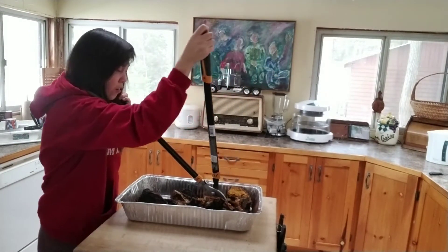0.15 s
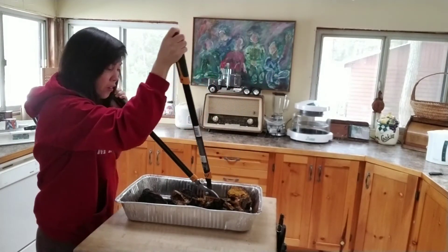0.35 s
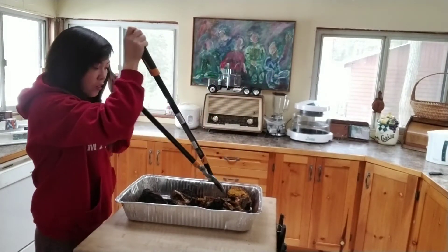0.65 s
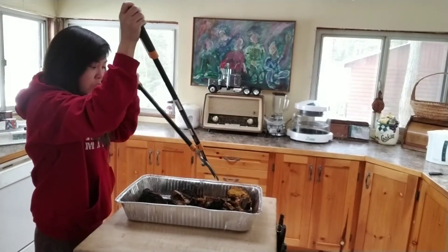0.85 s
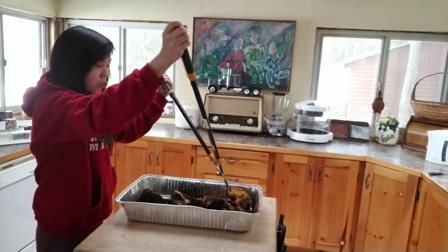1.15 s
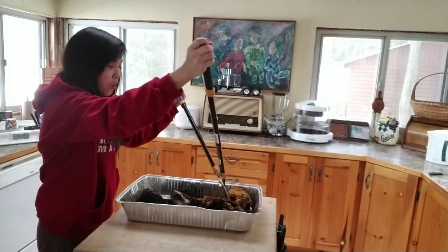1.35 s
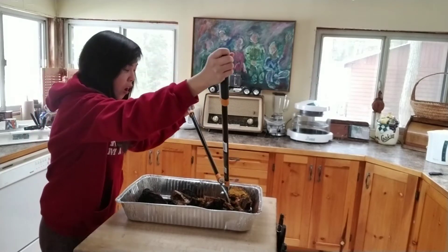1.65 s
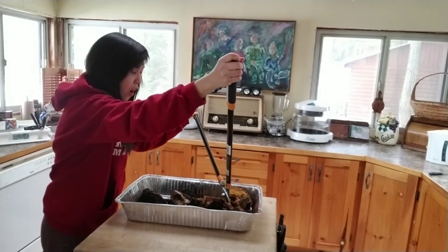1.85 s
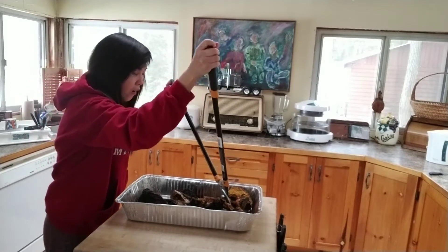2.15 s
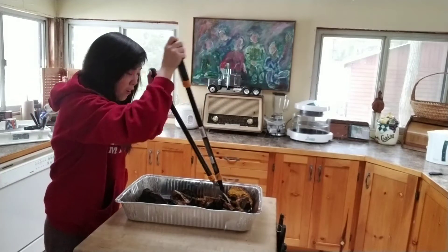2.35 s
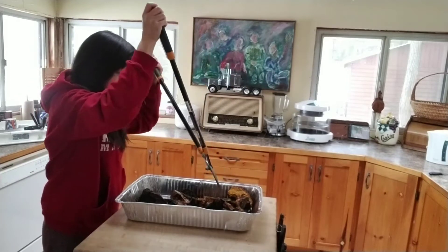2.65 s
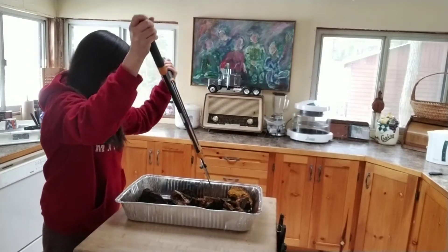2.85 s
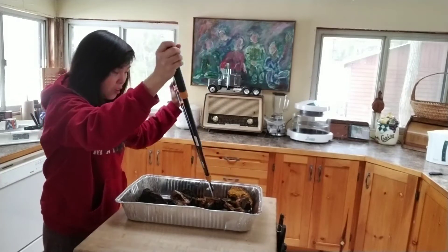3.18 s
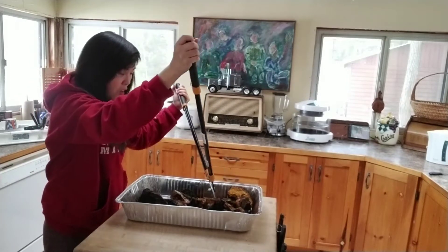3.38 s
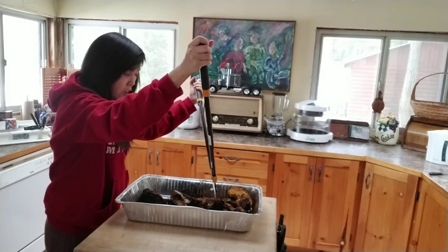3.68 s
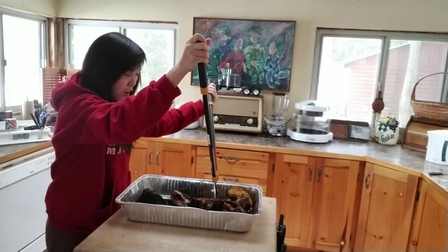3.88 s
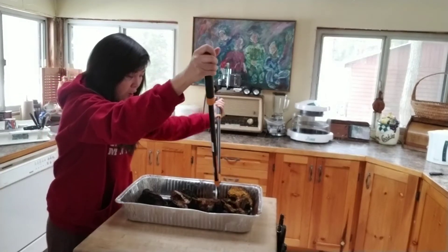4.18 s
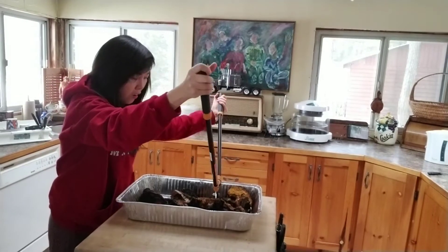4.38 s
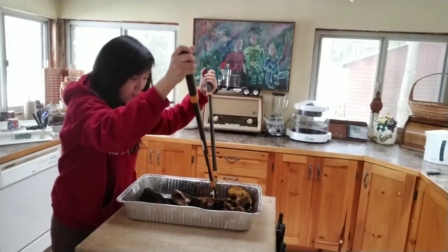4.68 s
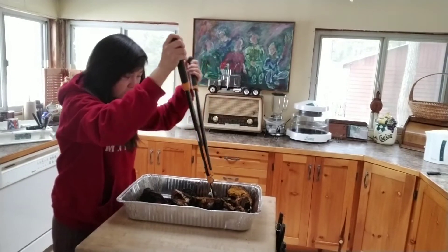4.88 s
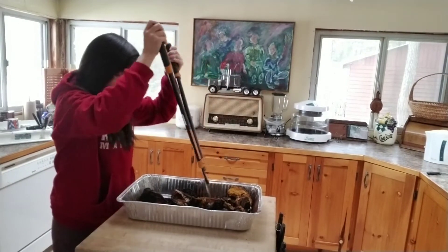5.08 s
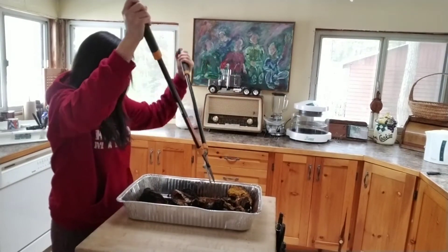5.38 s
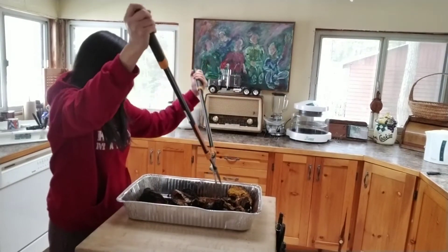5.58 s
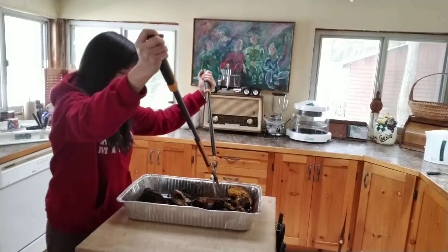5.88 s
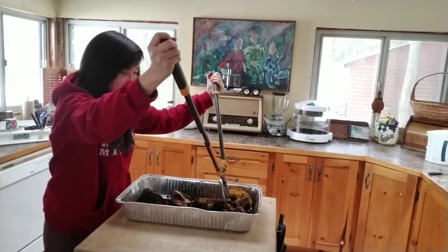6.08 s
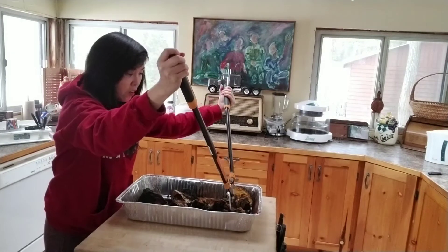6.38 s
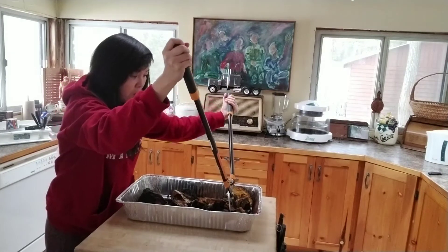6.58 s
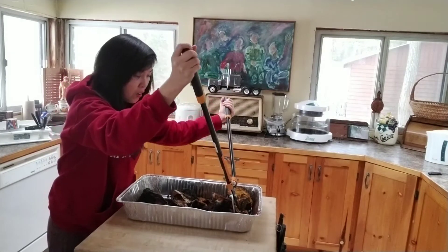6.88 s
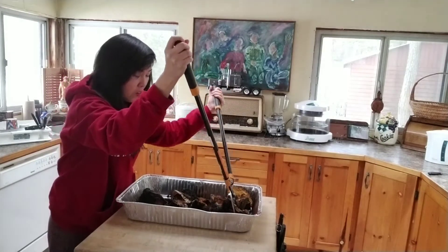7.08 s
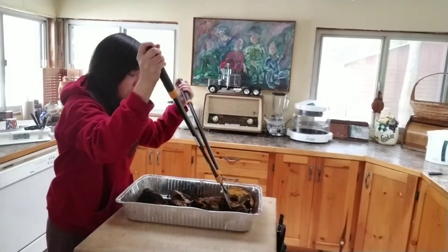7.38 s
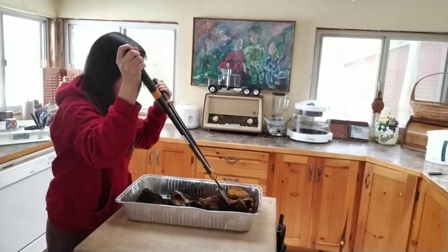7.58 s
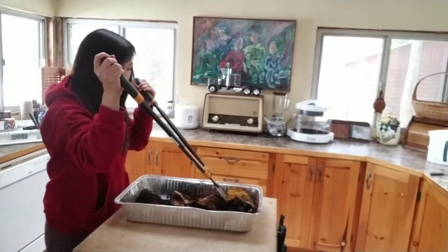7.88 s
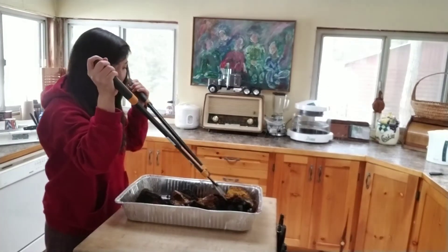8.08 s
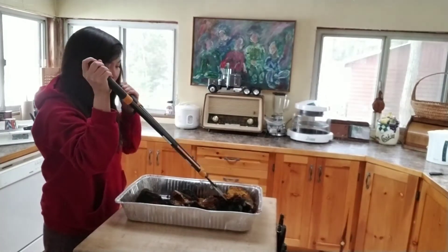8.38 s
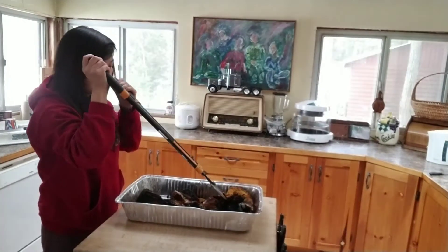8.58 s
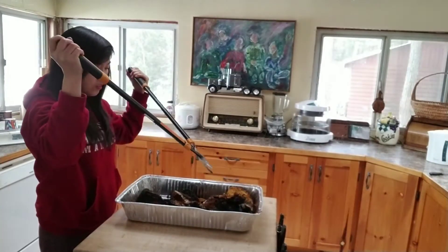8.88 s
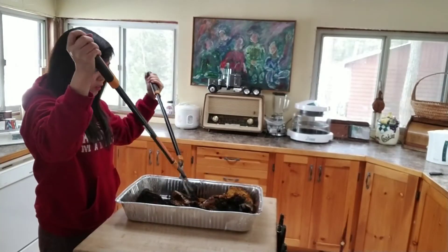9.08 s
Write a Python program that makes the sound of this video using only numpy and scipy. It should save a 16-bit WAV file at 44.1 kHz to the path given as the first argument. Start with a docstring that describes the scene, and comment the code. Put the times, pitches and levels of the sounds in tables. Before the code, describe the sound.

A faint, low appliance hum and soft room air run throughout a small, bright kitchen, heard close in stereo. A brief crumb scrape and soft pan bump open; at 0.5-0.7 s a dry crack and a steel clack. Near quiet follows, with tiny ticks around 1.7. From 2.0 gritty crunching and pan shudder build to a bright, clattering metal snap at 2.43, then a handle knock and crack at 2.55 and scattered foil ticks. A woody chunk bump at 3.1, light splintering to 3.5, grinding from 3.75. At 4.33 the loudest blow: a deep pan thump with a crack, then rubbing and small thuds. Hard clacks at 5.03 and 5.35, a handle knock between at 5.2. After a pause, a crunch at 6.3, then rapid small cracks and grinding until 7.4, another at 7.7. Cracks and ticks at 8.45-8.6 end with a thin, high double squeak; then hum.

```python
"""Lopper cutting woody mushroom

A long-handled lopper cuts hard mushroom chunks in a foil pan on a kitchen worktop.
Fibre cracks, steel clacks, handle knocks, chunk bumps and foil ticks are noise bursts shaped by filters or modes.
The pan thumps and shudders through the modes of the board; crumb and foil grains grind with every push.
The pivot sings in two short sine slips. A bright small room of decaying noise rings after each sound,
over an appliance hum made of narrow noise bands and soft air noise."""
import sys
import numpy as np
from scipy import signal
from scipy.fft import rfft, irfft, next_fast_len
from scipy.io import wavfile
from scipy.ndimage import uniform_filter1d

SR = 44100
rng = np.random.default_rng(int(sys.argv[2]) if len(sys.argv) > 2 else 0)


def generate_wav(sig):
    """Save sig (samples, or channels by samples) to the path in sys.argv[1] as 16-bit PCM at SR."""
    pcm = np.round(np.clip(np.atleast_2d(sig).T, -1, 1) * 32767).astype(np.int16)
    wavfile.write(sys.argv[1], SR, pcm)


N = 407484
SPAN = 2 ** 14  # longest blow or room response [samples]

# Modes of the board under the pan: (frequency [Hz], level [dB], t60 [s])
BOARD_MODES = [(91, -10, .2), (115, -1, .15), (142, 1, .08), (165, -1, .12), (209, 0, .11), (249, 2, .13),
               (286, 1, .13), (313, -3, .08), (348, -6, .09), (400.7, -2, .21), (651, -4, .18),
               (715, -7, .1), (835, -7, .18), (884, -10, .18)]
# Spectrum of hard parts in rough contact: (frequency [Hz], level [dB])
CONTACT_SPECTRUM = [(100, -11), (600, -4.5), (1100, 2), (1500, -4.5), (3000, 0.5), (5800, -8.5), (7000, -8),
                    (8500, -12.5), (10500, -28.5), (12500, -23), (14500, -35.5)]


def amp(db):
    """Decibels to gain."""
    return 10 ** (np.asarray(db) / 20)


def add(track, s, sound):
    """Mix a sound into a track at time s, cut off at the track's end."""
    start = max(int(s * SR), 0)
    track[start:start + len(sound)] += sound[:max(len(track) - start, 0)]


def unit(x):
    """Scale to an energy of one."""
    return x / np.sqrt(np.sum(x ** 2))


def steady(x):
    """Scale to an rms of one."""
    return x / np.sqrt(np.mean(x ** 2))


def along(points, hz):
    """Read (Hz, value) points on a log-frequency axis."""
    f, value = np.transpose(points)
    return np.interp(np.log(np.maximum(hz, 1)), np.log(f), value)


def colour(x, points):
    """Causal minimum-phase filter with the gain of (Hz, dB) points."""
    size = 2 * next_fast_len(x.shape[-1] // 2 + SPAN // 8)
    gain = amp(along(points, np.fft.rfftfreq(size, 1 / SR)))
    # folding the cepstrum forward in time makes the filter causal
    cepstrum = irfft(np.log(gain))
    cepstrum[1:size // 2] *= 2
    cepstrum[size // 2 + 1:] = 0
    response = np.exp(rfft(cepstrum))
    return irfft(rfft(x, size) * response)[..., :x.shape[-1]]


def diffuse(size, alike_hz=650):
    """Noise arriving from all sides: long waves reach both ports nearly alike."""
    mid, side = rfft(rng.standard_normal((2, size)))
    likeness = .96 / (1 + (np.fft.rfftfreq(size, 1 / SR) / alike_hz) ** 4)
    mid = mid * np.sqrt(1 + likeness)
    side = side * np.sqrt(1 - likeness)
    return irfft(np.array([mid + side, mid - side]), size) / np.sqrt(2)


def ring(modes, scatter_db, polarity=-1):
    """Damped sine modes with randomly scattered levels, as blows land on different spots."""
    t = np.arange(SPAN) / SR
    out = np.zeros(SPAN)
    for k, (hz, db, t60) in enumerate(modes):
        # -1 flips every other mode; a fraction weakens each further mode
        strength = polarity ** k * amp(db + scatter_db * rng.standard_normal())
        out += strength * np.sin(2 * np.pi * hz * t) * np.exp(-np.log(1000) * t / t60)
    return unit(out)


def grains(size, rate, spread_db):
    """Tiny fractures at random moments (rate per second), a few much larger than the rest."""
    strength = amp(spread_db * np.minimum(rng.exponential(size=size), 4))
    happens = rng.random(size) < rate / SR
    return happens * strength * rng.choice([-1, 1], size)


def burst(length, rate=7000, spread_db=4):
    """An avalanche of tiny fractures that dies away with the time constant length [s]."""
    decay = np.exp(-np.arange(SPAN) / SR / max(length, 1 / SR))
    return grains(SPAN, rate, spread_db) * decay


def even(spray, length, count=2):
    """Flatten the spectrum of a spray of impacts from many faces, so no one pitch stands out."""
    fade = np.exp(-np.arange(SPAN) / SR / (6 * max(length, .001)))
    for _ in range(count):
        spray = irfft(np.exp(1j * np.angle(rfft(spray)))) * fade
    return spray


def effort(rows):
    """Strength of (start s, length s, dB) pushes: each swells, holds and, after its length, dies away."""
    attack_s, release_s = 0.031, 0.045
    out = np.zeros(N)
    for s, length, db in rows:
        t = np.arange(int(length * SR) + SPAN) / SR
        swell = np.minimum(t / attack_s, 1) ** 2
        let_go = np.exp(-np.maximum(t - length, 0) / release_s)
        add(out, s, amp(db) * swell * let_go)
    return out


def jerks(rate, depth_db):
    """A hand never pushes evenly: smoothed random steps (rate per second) vary the force."""
    hold = int(SR / rate)
    steps = np.repeat(rng.standard_normal(N // hold + 1), hold)[:N]
    force = uniform_filter1d(np.clip(steps, -2, 2), hold // 2)
    return steady(amp(depth_db * force))


def hum():
    """An appliance drones in wavering bands of noise, each peaking at its own frequency."""
    # Hum bands: (frequency [Hz], level [dB], width at half amplitude [Hz])
    bands = [(118.1, -65.5, 3.7), (202, -60.5, 23), (223.1, -57.5, 13), (296, -62, 9.5), (353.4, -60.5, 22),
             (398, -65.5, 12), (527, -71, 4), (705, -68.5, 6), (2790, -84.5, 140), (6580, -87, 560)]
    hz = np.fft.rfftfreq(N, 1 / SR)
    lines = sum(amp(db) * unit(1 / (1 + (2 * (hz - f) / width) ** 2)) for f, db, width in bands)
    return irfft(rfft(diffuse(N)) * lines, N) * np.sqrt(len(hz))


def air(level_db=-54):
    """Soft diffuse noise fills the room, strongest in the bass."""
    # Spectrum of the room air: (frequency [Hz], level [dB])
    air_spectrum = [(25, -36), (50, -6), (80, -16.5), (125, -8.5), (220, -6), (330, -7.5), (500, -14),
                    (800, -19), (1300, -23.5), (2000, -41), (4000, -43.5), (14500, -47.5)]
    return amp(level_db) * steady(colour(diffuse(N), air_spectrum))


def wash(build_s=0.00041):
    """One pattern of reflections from cupboards and walls, each band with its own decay."""
    # Decay of the kitchen: (frequency [Hz], t60 [s])
    decays = [(200, 0.36), (600, 0.45), (1500, 0.39), (4000, 0.47), (10000, 0.33)]
    t, hz = np.arange(SPAN) / SR, np.fft.rfftfreq(SPAN, 1 / SR)
    noise, out = rfft(diffuse(SPAN)), 0
    for f, t60 in decays:
        # crossfade weight: one at this band, zero at its neighbours
        share = along([(g, float(g == f)) for g, _ in decays], hz)
        envelope = np.exp(-np.log(1000) * t / t60) * (1 - np.exp(-t / build_s))
        out = out + irfft(noise * share) * unit(envelope)
    return out


def kitchen(direct, radiated, bounce_s=0.0057, bounce_db=-5, count=14):
    """Direct sound, a thin bounce off the worktop with less bass, and a room wash redrawn for equal stretches
    of time."""
    # Reverberation against the direct sound: (frequency [Hz], level [dB])
    wet = [(100, -10.5), (350, 2.5), (750, 2), (1300, 7), (2200, 6.5), (6000, 4), (14000, 5.5)]
    out = np.zeros((2, N))
    bounce = amp(bounce_db) * colour(direct, [(300, -13.0), (1200, -9.5)])
    for port, lag in zip(out, (2 / SR, 0)):  # the left port hears it two samples late
        add(port, lag, direct)
        add(port, bounce_s + 2 * lag, bounce)
    send = colour(radiated, wet)
    for stretch in np.array_split(np.arange(N), count):
        for port, response in zip(out, wash()):
            add(port, stretch[0] / SR, signal.fftconvolve(send[stretch], response))
    return out


def shudder(rumble_db=-2):
    """The dragged pan sticks and slips on the board in soft bumps that shake its low modes."""
    # Hard pushes that drag the pan: (start [s], length [s], level [dB])
    drags = [(2.24, 0.17, -49), (4.55, 0.44, -52), (6.6, 0.82, -55)]
    slips = grains(N, rate=87, spread_db=7.0)
    shaken = signal.fftconvolve(slips, ring(BOARD_MODES, scatter_db=1.0))[:N]
    body = colour(shaken, [(90, -9.0), (290, -18.0), (400, -18), (800, -26)])
    rumble = colour(slips, [(30, -7.0), (70, -7.5), (300, 10.5), (600, -32.5), (2000, -60.0)])
    return effort(drags) * steady(steady(body) + amp(rumble_db) * steady(rumble))


def squeaks():
    """The dry pivot sticks and sings one thin note in two short slips."""
    # Pivot slips: (time [s], level [dB], length [s], pitch [Hz])
    slips = [(8.607, -46, .024, 5180), (8.636, -45, .03, 5173)]
    out = np.zeros(N)
    for s, db, length, hz in slips:
        t = np.arange(int(length * SR)) / SR
        swell = signal.windows.tukey(len(t), .5)
        add(out, s, amp(db) * swell * np.sin(2 * np.pi * hz * t))
    return out


def blows(rows, modes, contact_db, gain_db, lowest_hz):
    """Hard parts meet in a rough, chattering contact and ring; little radiates below the lowest mode."""
    out = np.zeros(N)
    for s, db, treble_db, length in rows:
        chatter = even(burst(length, rate=12000, spread_db=0), length)
        contact = unit(colour(chatter, CONTACT_SPECTRUM))
        hit = ring(modes, scatter_db=1.5) + amp(contact_db) * contact
        hit = colour(hit, [(lowest_hz / 3, -14), (lowest_hz, 0), (1000, 0), (4600, treble_db)])
        add(out, s, amp(db + gain_db) * unit(hit))
    return out


def chunk_bumps():
    """Woody chunks bump together: rough contact noise over a few low, damped modes."""
    # Bumps: (time [s], level before gain [dB], treble [dB], contact decay [s])
    bumps = [(2.104, -28, -11, 0.012), (3.107, -22.5, -16, 0.014), (3.14, -36.5, -18, 0.0058),
             (6.795, -27.5, -16, 0.0065), (7.262, -33.5, -6, 0.0062)]
    # Modes of a chunk: (frequency [Hz], level [dB], t60 [s])
    chunk_modes = [(382, 4, 0.07), (454, 5, 0.045), (516, 5, 0.09), (660, 1, 0.045), (953, -2, 0.014)]
    return blows(bumps, chunk_modes, contact_db=-1.5, gain_db=15.5, lowest_hz=330)


def handle_knocks():
    """Handles knock on their stops and ring in damped modes over a little contact noise."""
    # Knocks: (time [s], level before gain [dB], treble [dB], contact decay [s])
    knocks = [(2.546, -24, 1, 0.00087), (2.604, -29.5, 5, 0.0026), (5.196, -18.5, -3.5, 0.0022)]
    # Modes of a handle: (frequency [Hz], level [dB], t60 [s])
    handle_modes = [(733, -5.5, .085), (836, -5, .045), (945, -4, .026), (1055, -4, .036), (1170, -3, .012),
                    (2180, -12, .012)]
    return blows(knocks, handle_modes, contact_db=-13, gain_db=21, lowest_hz=720)


def ticks(contact_s=0.002, gain_db=13):
    """Hard crumbs tap the thin foil in short, sharp bursts of fractures."""
    # Ticks: (time [s], level before gain [dB], treble [dB])
    taps = [(0.138, -43.5, -2), (0.857, -33.5, 16), (1.718, -55, 25), (2.195, -31.5, 15),
            (2.276, -30.5, -4), (2.279, -28.5, -6), (2.389, -32, -8), (2.426, -20.5, 18), (2.622, -28, 1),
            (2.676, -30, 3), (2.732, -34.5, 20), (2.806, -34, -10), (3.29, -39, 13), (3.965, -33, -12),
            (4.143, -30, 4), (4.279, -44, -1), (4.615, -39.5, -4), (6.354, -34, 35), (6.431, -26.5, 30),
            (6.67, -38.5, -7), (7.36, -35, -11), (7.806, -39, 23), (8.446, -30, 31), (8.575, -29, 5)]
    # Spectrum of tapped foil: (frequency [Hz], level [dB])
    foil_spectrum = [(500, 7.5), (1500, 6), (3000, 8), (4500, 7), (7200, 4), (10500, -14.5), (13000, -32.5)]
    out = np.zeros(N)
    for s, db, treble_db in taps:
        tap = colour(burst(contact_s, rate=9600), foil_spectrum)
        tap = colour(tap, [(6000, 0.0095), (13000, treble_db)])
        add(out, s, amp(db + gain_db) * unit(tap))
    return out


def thumps(thud_db=-3, thud_s=0.02, gain_db=26):
    """Jaws and chunks drive the pan onto the board: its low modes ring over a dull, rattling thud."""
    # Pan blows: (time [s], level before gain [dB], bass at 130 Hz [dB], middle [dB])
    pan_blows = [(0.048, -39.5, 9.5, -3), (0.528, -38, 0, 4.5), (2.219, -34.5, 8, -14), (2.358, -35, 7, 0),
                 (4.3315, -11, 0.5, -6.5), (4.635, -35.5, -1.5, -10.5), (4.705, -43.5, 2, -11),
                 (4.787, -34, -1.5, -6), (4.859, -39, -3, -29), (4.913, -45, 1.5, -21),
                 (6.327, -32, 10.5, 4), (6.429, -41, 15, 5), (6.785, -31.5, 16, 10.5),
                 (7.712, -28.5, -8.5, -0.5), (8.465, -33.5, -6, 3.5)]
    thud_spectrum = [(40, -17.5), (82, 3), (100, -3.0), (122, 5.0), (160, 5.5),
                     (400, -5.5), (520, -8.0), (750, -3.0), (1150, -11.5), (4000, -55)]
    out = np.zeros(N)
    for s, db, bass_db, middle_db in pan_blows:
        thud = unit(colour(even(burst(thud_s), thud_s), thud_spectrum))
        hit = ring(BOARD_MODES, scatter_db=0.15) + amp(thud_db) * thud
        hit = colour(hit, [(60, 1.81 * bass_db), (130, bass_db), (270, 0), (700, middle_db)])
        add(out, s, amp(db + gain_db) * unit(hit))
    return out


def grinding():
    """With each push, crumbs crush between the jaws and scratch over the foil in fits and starts."""
    # Jaw pushes: (start [s], length [s], crumb level [dB], foil level [dB])
    pushes = [(0.01, 0.081, -60, -63), (0.265, 0.43, -67.5, -72), (0.454, 0.42, -70, -66.5),
              (1.458, 0.072, -81, -73), (1.7, 0.029, -80, -77), (2.012, 0.081, -54.5, -62),
              (2.187, 0.32, -57.5, -56), (2.53, 0.36, -60, -75), (3.039, 0.48, -65.5, -75),
              (3.742, 0.32, -59, -72), (4.08, 0.38, -53, -66), (4.502, 0.38, -63.5, -62.5),
              (4.867, 0.099, -60, -58.5), (6.31, 0.063, -43.5, -60), (6.588, 0.36, -55.5, -74),
              (7.02, 0.47, -55, -62.5), (7.42, 0.024, -76, -63), (7.603, 0.25, -53, -62.5),
              (8.36, 0.073, -74, -64), (8.408, 0.13, -54, -61), (8.557, 0.16, -55, -63)]
    # Spectra of crushed crumbs and scratched foil: (frequency [Hz], level [dB])
    crumb_spectrum = [(100, -33), (450, 15.5), (1200, 10.5), (2800, 0), (5000, -11.5), (14000, -53)]
    scratch_spectrum = [(1500, 0.5), (4000, -1.5), (7000, -2), (10500, -12.5), (13000, -15), (15000, -29.5)]
    crumbs = steady(colour(grains(N, rate=420, spread_db=3.0), crumb_spectrum))
    foil = steady(colour(grains(N, rate=940, spread_db=4.0), scratch_spectrum))
    crushing = effort([(s, length, db) for s, length, db, _ in pushes])
    scratching = effort([(s, length, db) for s, length, _, db in pushes])
    return (crushing * crumbs + scratching * foil) * jerks(rate=45, depth_db=3.5)


def clacks(gain_db=17.5, chatter_db=0.5):
    """The steel linkage snaps over: a rough contact chatters and drives the modes of the jaws."""
    # Clacks: (time [s], level before gain [dB], treble [dB], contact decay [s], blade ring [dB])
    snaps = [(0.604, -21, 6, 0.0068, 4), (0.618, -37, 3, 0.0016, 2), (0.703, -37, 19, 0.0048, 2),
             (2.4255, -19.5, 13.5, 0.0043, 8.5), (2.43, -28.5, -3.5, 0.0034, 0),
             (2.44, -23.5, 3, 0.0075, 15.5), (5.029, -19, 3, 0.0022, -2.5), (5.033, -22.5, 1.5, 0.0033, 4),
             (5.345, -22.5, -5.5, 0.0013, -10), (5.349, -32, 0, 0.0035, -12)]
    # Modes of the steel jaws: (frequency [Hz], level [dB], t60 [s])
    steel_modes = [(1090, -3, .012), (1270, 0, .013), (1730, 2, .016), (2070, -2, .012), (2434, -9, .06),
                   (2896, -2, .017), (3130, -4, .013), (3500, -2, .007), (3926, -24, .12), (4350, -4, .008),
                   (6900, -1, .004)]
    out = np.zeros(N)
    for s, db, treble_db, length, blade_db in snaps:
        push, chatter = (even(burst(length, rate=12000, spread_db=1), length) for _ in range(2))
        jaws = ring(steel_modes, scatter_db=3, polarity=0.75)
        steel = unit(signal.fftconvolve(push, jaws)[:SPAN])
        blade = colour(steel, [(720, -9), (1200, 0), (1730, blade_db), (2700, 0)])
        hit = blade + amp(chatter_db) * unit(colour(chatter, CONTACT_SPECTRUM))
        hit = colour(hit, [(250, -6.5), (1000, 4.5), (4600, treble_db)])
        add(out, s, amp(db + gain_db) * unit(hit))
    return out


def cracks(snap_db=-3, brittle_s=0.0047, ring_db=11.5, body_db=4, gain_db=20):
    """A bundle of mushroom fibres gives way in a snap and splinters, and rings its chunk."""
    # Breaks: (time [s], level before gain [dB], treble [dB], splinter decay [s], chunk ring [Hz])
    breaks = [(0.525, -32, -4.5, 0.016, 1350), (0.607, -28, -32, 0.0073, 1700),
              (1.72, -54.5, 3, .002, 1490), (1.744, -56, -6, 0.0078, 2780), (2.098, -38.5, -7, 0.031, 800),
              (2.364, -38.5, -2, 0.0028, 1300), (2.545, -23, -12, 0.0002, 2140),
              (2.547, -24.5, -19, .0003, 3680), (3.083, -39.5, -8, 0.015, 1160),
              (3.143, -37, -3, 0.0025, 950), (3.406, -41.5, -6, 0.019, 1350),
              (3.436, -40, -18, 0.0018, 2140), (3.988, -36.5, -20, 0.0076, 1610),
              (4.139, -31, -34, 0.0029, 1230), (4.332, -19.5, -13, 0.0052, 680),
              (4.333, -29, -15, 0.0012, 2400), (4.533, -39, -1.5, 0.0022, 1810),
              (4.784, -31, -12, 0.0018, 1480), (6.326, -40.5, -4, 0.0065, 1060),
              (6.35, -50.5, 12, 0.0017, 1420), (6.368, -38.5, -17, 0.003, 1170),
              (6.429, -42, 6.5, 0.0016, 2200), (6.446, -32.5, -24, 0.0053, 1160),
              (6.462, -35.5, -17, 0.002, 1250), (6.603, -38.5, -13, 0.0015, 1820),
              (6.774, -46, -7, 0.0032, 1400), (6.784, -30.5, -9, 0.0034, 1380),
              (6.816, -43, -1, 0.0022, 1700), (6.879, -31, -12.5, 0.0028, 1630),
              (6.902, -40.5, -14, 0.0038, 3130), (7.037, -36, -17, 0.0022, 2480),
              (7.057, -36, -13, 0.0056, 1380), (7.116, -35, -7, 0.003, 2450),
              (7.24, -33.5, -16, 0.0031, 1060), (7.252, -38, 1.5, 0.012, 1320),
              (7.318, -32, -1.5, 0.0063, 2560), (7.413, -37.5, -3, 0.0083, 1230),
              (7.65, -40, -14, 0.007, 1090), (7.709, -31, -5.5, 0.011, 690), (8.466, -32, 1.5, 0.0041, 960),
              (8.575, -36, -22, 0.011, 1220), (8.614, -37, -19, 0.0037, 1340)]
    # Spectrum of breaking fibres: (frequency [Hz], level [dB])
    fibre_spectrum = [(80, -29), (350, -17.5), (750, 3.5), (1300, -5), (2500, -4), (4000, -5), (5500, -5),
                      (7200, -4), (10500, -16), (13000, -17.5), (15000, -40)]
    out, t = np.zeros(N), np.arange(SPAN) / SR
    for s, db, treble_db, length, hz in breaks:
        # breaks longer than brittle_s have a weaker snap; splinters swell before they die away
        snap = amp(snap_db) * brittle_s / max(length, brittle_s) * unit(burst(.0009, rate=11000))
        splinters = unit(burst(length, rate=1500, spread_db=2.5) * np.sqrt(t))
        fibres = colour(even(snap + splinters, length), fibre_spectrum)
        # the woody chunk is heavily damped, so it rings in one broad band
        chunk = [(hz / 1.45, 0), (hz, ring_db), (hz * 1.45, 0)]
        crack = unit(colour(fibres, chunk))
        crack = colour(crack, [(650, body_db), (1400, 0.019), (3000, 0), (7000, treble_db)])
        add(out, s, amp(db + gain_db) * crack)
    return out


def scene(pivot_room_db=-11, pan_room_db=-6, crack_room_db=-2.5):
    """The open pan throws cracks, ticks and squeaks forward, so less of them reaches the room."""
    work = clacks() + handle_knocks() + chunk_bumps() + thumps() + grinding() + shudder()
    in_pan, breaks, pivot = ticks(), cracks(), squeaks()
    direct = work + in_pan + breaks + pivot
    radiated = work + amp(pan_room_db) * in_pan
    radiated = radiated + amp(crack_room_db) * breaks + amp(pivot_room_db) * pivot
    return kitchen(direct, radiated) + hum() + air()


def record(dry):
    """Each microphone port has its own colour; the top is cut steeply."""
    # Difference of the ports: (frequency [Hz], left minus right [dB])
    port_tilt = [(100, 2.5), (900, 1.7), (2000, 2), (4200, 3.5), (7500, 6.5), (12000, -5.5)]
    top_hz = 15000
    ports = np.array([colour(x, [(hz, sign * db / 2) for hz, db in port_tilt])
                      for x, sign in zip(dry, (1, -1))])
    steep_cut = signal.ellip(8, .2, 70, top_hz, fs=SR, output="sos")
    return signal.sosfilt(steep_cut, ports)


dry = scene()
out = record(dry)
generate_wav(out)
```